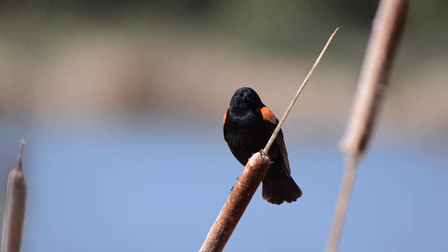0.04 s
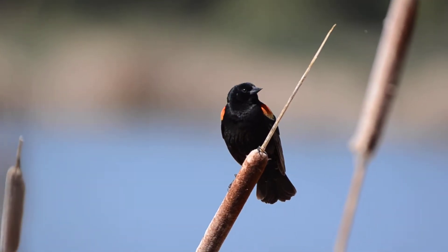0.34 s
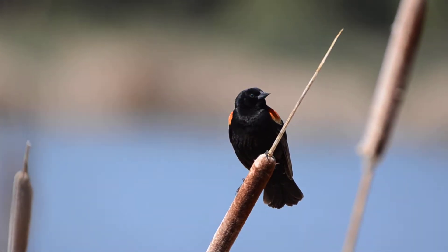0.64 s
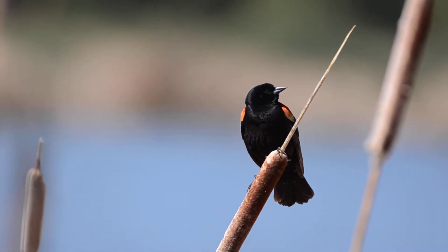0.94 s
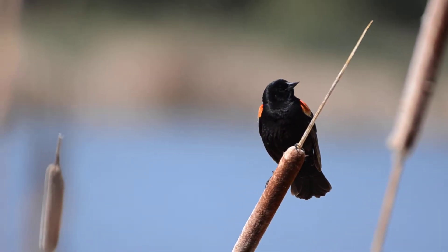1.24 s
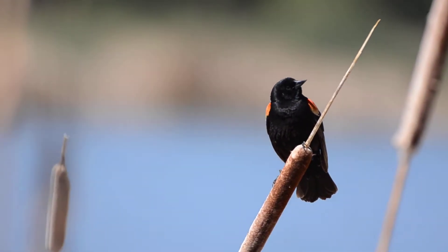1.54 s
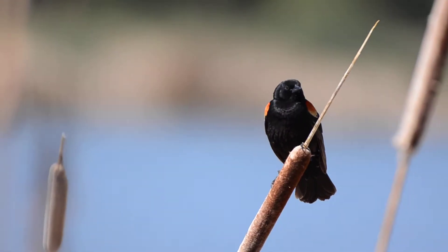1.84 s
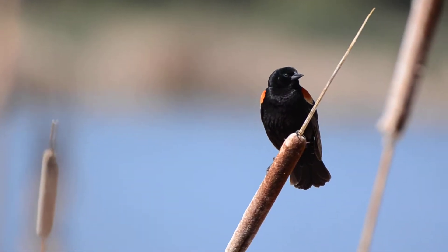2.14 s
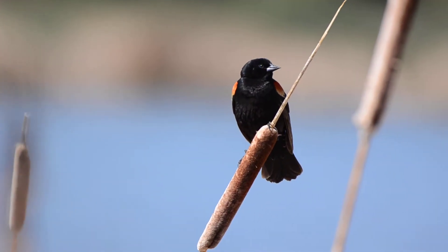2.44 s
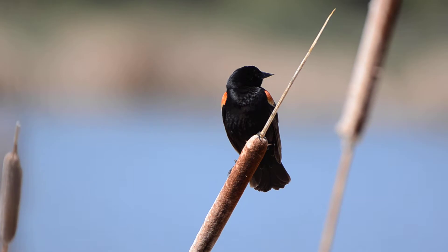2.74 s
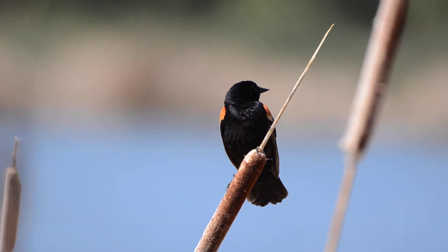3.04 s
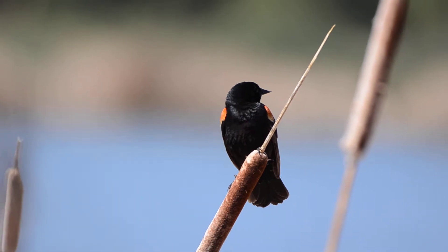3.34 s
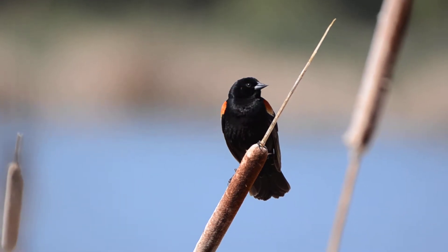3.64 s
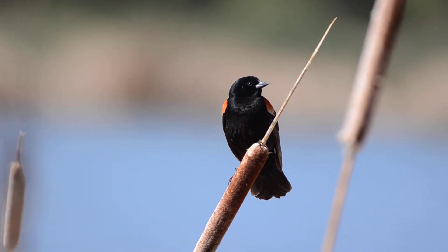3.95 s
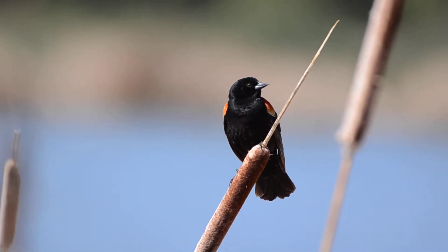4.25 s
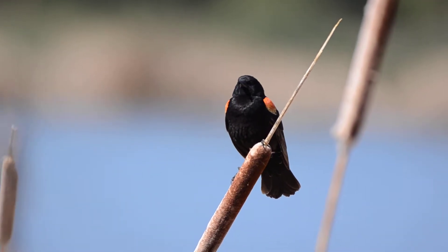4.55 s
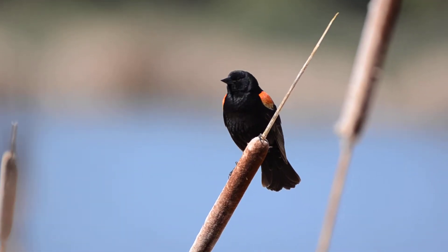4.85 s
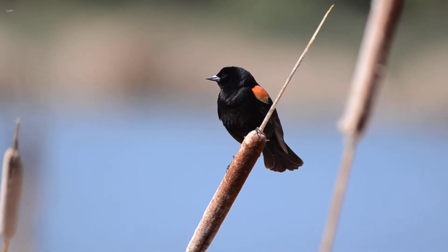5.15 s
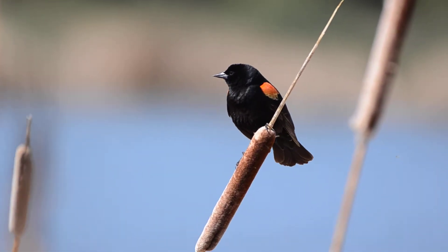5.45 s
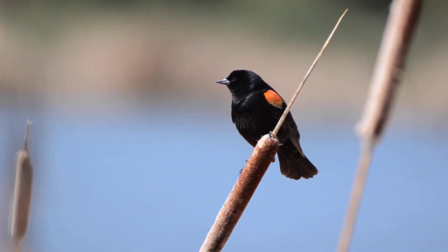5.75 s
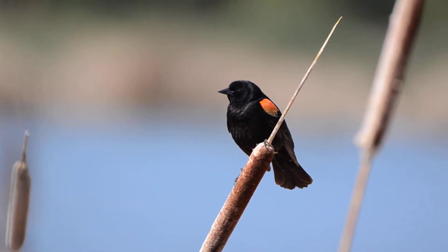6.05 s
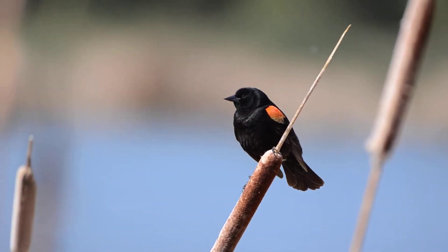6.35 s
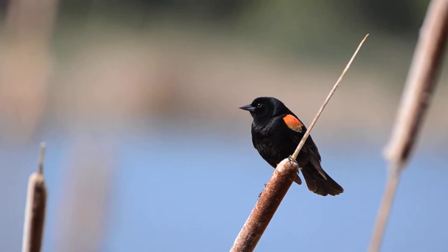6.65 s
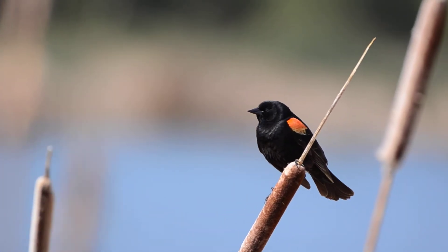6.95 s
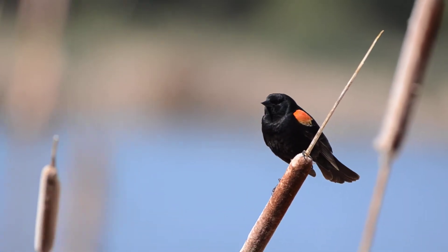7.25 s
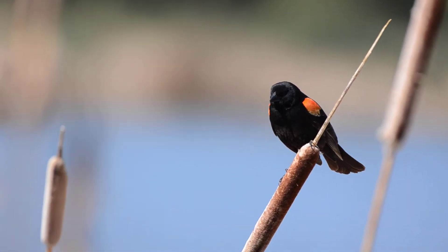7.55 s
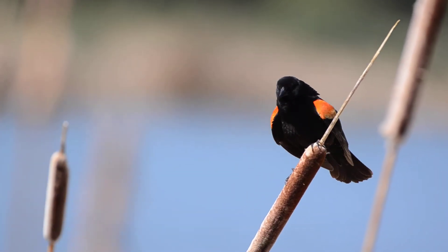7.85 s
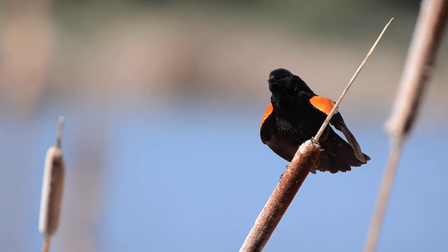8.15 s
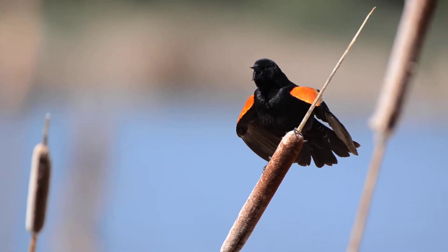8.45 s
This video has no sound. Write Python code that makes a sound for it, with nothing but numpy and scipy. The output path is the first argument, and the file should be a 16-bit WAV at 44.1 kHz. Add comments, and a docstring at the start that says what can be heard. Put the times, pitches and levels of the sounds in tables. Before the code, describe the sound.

Faint blackbird whistles and buzzy trills carry across a marsh over a low murmur of distant traffic. Two spells of gusty wind buffet the microphone, louder than the birds, the second stronger and with a few tiny overload ticks. Between the gusts a close blackbird gives a single dry chip. At the very end it starts singing, with short notes, a quick stutter and a raspy trill.

```python
"""Blackbirds on a windy marsh

Two distant red-winged blackbirds give slurs, whistles and buzzy trills, the two sides of the syrinx
taking turns; a male close to the microphone gives a dry 'check', then starts his own song. Reed beds
scatter every call, and the far shore echoes the second trill. Gusts buffet the microphone, the hardest
eddies overloading it with a tick, while far traffic murmurs behind."""
import sys
import numpy as np
from scipy import signal
from scipy.fft import rfft, irfft, next_fast_len
from scipy.io import wavfile
from scipy.ndimage import map_coordinates

SR = 44100
rng = np.random.default_rng(int(sys.argv[2]) if len(sys.argv) > 2 else 0)


def inscribe(sig):
    """Save sig as 16-bit PCM at rate SR to the path in sys.argv[1].

    A 1-D sig is mono; a 2-D sig holds one channel per row.
    Samples are clipped to [-1, 1] before scaling.
    """
    pcm = np.round(np.clip(np.atleast_2d(sig).T, -1, 1) * 32767)
    wavfile.write(sys.argv[1], SR, pcm.astype(np.int16))


N = 375291

# tones in one trill beat: f/Hz, relative level/dB, place/beat, length/beat, pitch arch/share of f
FIRST_FAR_BEAT = [(2950, 0, 0.5, .6, 0.055), (2570, -5, 0.6, 0.51, 0.023), (3350, -11, 0.2, 0.91, .03)]
SECOND_FAR_BEAT = [(2940, 0, 0.4, .62, 0.062), (2610, -13.5, 0.55, 0.63, .03), (3570, -16, 0.54, .9, .03),
                   (3820, -10.5, .5, 0.69, 0.028), (4120, -13, .9, 0.83, 0.045), (5523, -18, .1, 0.32, .04)]
CLOSE_BEAT = [(2920, 1, 0.34, 0.99, 0.037), (2630, -14, 0.3, .9, .04), (3660, -13, 0.15, 0.53, 0.022),
              (3800, -5, .45, 0.7, 0.065), (4360, -14, .8, 1, .04), (5970, -9, 0.88, 0.35, 0.024),
              (6200, -16.5, 0.35, .8, .04)]
# close male's opening notes and hoarse lead-in: t/s, length/s, start f/Hz, end f/Hz, level/dB
OPENING_NOTES = [(8.045, 0.12, 1463, 1518, -39.5), (8.068, 0.071, 5900, 6090, -73),
                 (8.208, 0.031, 6070, 6320, -65.5), (8.214, 0.034, 2373, 2240, -56),
                 (8.236, 0.057, 6116, 5690, -73), (8.233, 0.0073, 1650, 1947, -39.5),
                 (8.238, 0.022, 1940, 1994, -52)]
LEAD_IN_NOTES = [(8.339, 0.033, 2465, 2717, -36.5), (8.362, 0.026, 4470, 4876, -49.5)]
# his stutter of falling chips: t/s, level/dB
STUTTER_CHIPS = [(8.2825, -42), (8.2922, -35), (8.3015, -36), (8.3105, -36.5), (8.3195, -42), (8.3285, -47)]
# partials of his 'check': f/Hz, relative level/dB
CHECK_PARTIALS = [(1150, -0.5), (1750, -10), (2640, -1.5), (3380, -5.5), (4140, -1.5), (4870, -4),
                  (5600, -12)]
# hiss in a bird's voice: f/Hz, relative density/dB
RASP_SPECTRUM = [(700, -46), (1500, -5), (4800, -8), (6500, -18), (8500, -20), (10500, -28.5),
                 (13000, -24.5), (16000, -44.5)]
# distant down-slurs: t/s, start f/Hz, level/dB
FAR_SLURS = [(.29, 2270, -64), (.35, 3000, -63.5), (.65, 2000, -57), (1.955, 2400, -62.5),
             (2.54, 2234, -48.5), (2.835, 2250, -60), (3.91, 2357, -65), (5.675, 2291, -54.5)]
# distant whistles: t/s, length/s, f/Hz, level/dB
FAR_WHISTLES = [(1.742, 0.029, 1920, -62), (2.672, 0.059, 3867, -60.5), (2.737, .091, 2407, -58.5),
                (5.607, 0.061, 2002, -58.5), (5.685, 0.064, 2074, -53.5), (5.768, .028, 4207, -53),
                (5.888, 0.078, 2255, -59), (5.905, 0.15, 1995, -59), (6.119, .13, 1408, -49),
                (6.245, 0.066, 2306, -61), (6.55, 0.047, 1447, -52), (6.944, 0.051, 2420, -58),
                (7.919, 0.09, 1032, -45)]
# decay of the scatter in the reed beds: f/Hz, t60/s
REED_DECAY = [(1500, .4), (2600, .75), (4000, .6), (6000, .3)]
# gusts over the microphone: crest t/s, level/dB, half-length/s
WIND_GUSTS = [(1.585, -43.5, 0.038), (2.19, -42.5, 0.14), (2.819, -34, .11), (3.08, -24.5, 0.094),
              (3.319, -26.5, 0.031), (3.479, -25.5, 0.043), (3.611, -33, 0.054), (4.038, -39.5, 0.035),
              (6.049, -40, 0.3745), (6.78, -19, .095), (7.113, -24.5, .04), (7.348, -25.5, 0.12),
              (7.628, -22, .095), (7.994, -28, 0.048), (8.33, -35.5, 0.24)]
# single eddies striking the microphone: t/s, level/dB, centre f/Hz
EDDIES = [(0.829, -27, 167), (0.912, -36, 130), (1.9, -34, 107), (2.262, -37, 166), (2.863, -17.5, 177),
          (2.902, -18, 248), (2.922, -14, 281), (3.003, -19, 197), (3.059, -25, 275), (3.105, -16, 278),
          (3.147, -19, 220), (3.35, -17, 233), (3.467, -17.5, 187), (3.493, -14, 311), (3.731, -27.5, 169),
          (4.307, -30, 158), (5.39, -22, 113), (6.07, -31, 111), (6.307, -32.5, 123.8), (6.495, -27.5, 133),
          (6.546, -20.5, 370), (6.609, -22.5, 251.4), (6.678, -15, 213), (6.726, -14, 400),
          (6.754, -8.5, 380), (6.78, -13.5, 350), (6.81, -14, 362), (6.855, -21, 333.5),
          (6.896, -12.5, 413.2), (6.944, -13, 385), (7.125, -15.5, 322.8), (7.236, -20, 324),
          (7.349, -18, 397), (7.553, -15, 392), (7.574, -18, 380.3), (7.638, -7, 359.4),
          (7.665, -11.5, 417.5), (7.727, -17.5, 300), (7.985, -15.5, 320), (8.001, -14, 362),
          (8.031, -12.5, 242), (8.218, -17, 316)]
# overloads under the hardest eddies: t/s, relative peak/dB
OVERLOADS = [(6.7201, -29), (6.7528, -47), (6.762, -27.5), (7.6345, -35.5), (8.0304, -42.5)]
# murmur of far traffic and reeds: f/Hz, relative density/dB
MURMUR_SPECTRUM = [(15, -38.5), (25, -6), (113, -1), (129, -12.5), (164, -12.5), (183, -26.5), (209, -3),
                   (240, -19), (274, -8.5), (349, -13), (648, -6.5), (1530, -22), (1800, -26.5),
                   (4500, -44), (15500, -56.5)]
# one far engine's lines: f/Hz, relative level/dB
ENGINE_LINES = [(70.0, -61), (107.7, -52.5), (215.3, -63.5), (269.2, -66.5)]


def trill(beat, start, end, beat_hz, db, swell_db, rough, fade_s=.0034):
    """The two sides of the syrinx take turns in each beat; every tone arches, never twice alike."""
    out, t = np.zeros(N), clock(end - start)
    gate = np.clip(np.minimum(t, t[-1] - t) / fade_s, 0, 1)
    effort = gate * amp(db + swell_db * (t / t[-1] - 1.5))
    for hz, tone_db, place, share, arch in beat:
        u = 2 * ((beat_hz * t - place + .5) % 1 - .5) / share  # -1 to 1 while the tone sounds
        pitch = hz * (1 + arch * (.3 - np.minimum(u ** 2, 1.5)) + .011 * wobble(220, t))
        level = amp(tone_db + 2 * wobble(200, t)) / (1 + u ** 6)
        add(out, start, effort * level * tone(pitch, t, rough, rough_rate=1100))
    return out


def notes(table, rough, rough_rate, taper=.72):
    """Each whistled note swells and fades while it slides in pitch."""
    out = np.zeros(N)
    for s, length, start_hz, end_hz, db in table:
        t = clock(length)
        swell = np.sin(np.pi * t / length) ** taper
        pitch = start_hz + (end_hz - start_hz) * t / length
        add(out, s, amp(db) * swell * tone(pitch, t, rough, rough_rate))
    return out


def stutter(top_hz=5200, rest_hz=3480, drop_s=.0012, chip_s=.0066):
    """Each chip plunges onto the same pitch."""
    out, t = np.zeros(N), clock(chip_s)
    pitch = rest_hz + (top_hz - rest_hz) * np.exp(-t / drop_s)
    swell = np.sin(np.pi * (t / chip_s) ** .7) ** 1.3
    for s, db in STUTTER_CHIPS:
        add(out, s, amp(db) * swell * tone(pitch, t, rough=.25, rough_rate=2000))
    return out


def check(s=5.013, db=-49, hiss_db=-48, width_s=.0065):
    """A dry call: a brief, rough stack of partials with a hiss."""
    out, t = np.zeros(N), clock(.06)
    from_crest = t - t.mean()
    swell = np.exp(-.5 * (from_crest / width_s) ** 2)
    bend = 1 - .0548 * np.tanh(from_crest / .01275) ** 2
    stack = sum(amp(level) * tone(hz * bend, t, rough=.7, rough_rate=700)
                for hz, level in CHECK_PARTIALS)
    hiss = noise(lambda hz: amp(along(RASP_SPECTRUM, hz)), len(t))
    add(out, s - t.mean(), amp(db) * swell * stack + amp(hiss_db) * swell ** 2 * hiss)
    return out


def rasp(song, hiss_db, octave_db, dull_hz):
    """Pushed hard, a voice adds its octave and a hiss."""
    analytic = signal.hilbert(song, next_fast_len(N))[:N]
    octave = np.cos(2 * np.angle(analytic))
    hiss = noise(lambda hz: amp(along(RASP_SPECTRUM, hz)) / np.hypot(1, (hz / dull_hz) ** 4), N)
    return np.abs(analytic) * (amp(hiss_db) * hiss + amp(octave_db) * octave)


def close_male():
    """Near the microphone: a 'check', later clear notes that break into a hoarse buzz."""
    opening = notes(OPENING_NOTES, rough=.037, rough_rate=750)
    buzz = stutter() + notes(LEAD_IN_NOTES, rough=.6, rough_rate=1500, taper=2)
    buzz += trill(CLOSE_BEAT, start=8.383, end=8.54, beat_hz=38.9, db=-43.3, swell_db=2, rough=.62)
    return opening + buzz + rasp(buzz, hiss_db=-19, octave_db=-37, dull_hz=7730) + check()


def far_calls(slur_s=.034, fall=.8, lift=.01):
    """From across the marsh come quick, rough falling slurs and purer, barely rising whistles."""
    slurs = [(s, slur_s, hz, hz * fall, db) for s, hz, db in FAR_SLURS]
    whistles = [(s, length, hz * (1 - lift), hz * (1 + lift), db) for s, length, hz, db in FAR_WHISTLES]
    return notes(slurs, rough=.46, rough_rate=330) + notes(whistles, rough=.28, rough_rate=200)


def reeds(x, early_db=3, early_t60=.044):
    """Close stems answer at once, then the whole marsh fades away."""
    hz, t, spectrum = signal.stft(rng.standard_normal(SR), SR, nperseg=256)
    marsh = amp(-60 * t / along(REED_DECAY, hz)[:, None])
    stems = amp(early_db - 60 * t / early_t60)
    tail = signal.istft(spectrum * (marsh + stems), SR, nperseg=256)[1]
    return signal.fftconvolve(x, np.pad(tail / np.linalg.norm(tail), (200, 0)))[:N]


def shore(x, delay_s=.42, db=-11.5, dull_hz=3900):
    """The wooded far shore sends back a late, dull, smeared echo."""
    late = np.pad(reeds(x), (int(delay_s * SR), 0))[:N]
    return amp(db) * filtered(late, lambda hz: 1 / np.hypot(1, (hz / dull_hz) ** 6))


def turbulence(centre_hz, speed, low_hz, reach, steep):
    """Eddy pressure swept past: small eddies die out steeply, and the microphone sheds the deep bass."""
    def spectrum(hz):
        bass_cut = (hz / np.hypot(hz, low_hz)) ** 2.3
        return bass_cut * np.exp(-(hz / (reach * centre_hz)) ** steep)
    return map_coordinates(noise(spectrum, len(speed)), [np.cumsum(speed)], mode="mirror")


def breeze(lull_db=-56.5, calm_db=-33, lumps_db=3.5, flank=3.3, quicken=.58):
    """Gusts rise out of light air; faster air is louder and sweeps eddies past sooner, so brighter."""
    t = np.arange(N) / SR
    gusts = (amp(db) / (1 + np.abs((t - s) / half_s) ** flank) for s, db, half_s in WIND_GUSTS)
    power = amp(lull_db) ** 2 + sum(gust ** 2 for gust in gusts)
    level_db = 10 * np.log10(power) + lumps_db * wobble(35, t)
    speed = np.clip(amp(quicken * (level_db - calm_db)), 1, 2.5)
    return amp(level_db) * turbulence(128, speed, low_hz=60, reach=.59, steep=.83)


def buffets(cycles=2.913, typical_db=-20.5, growth=.2, soft_hz=250):
    """Each large eddy is a lumpy swell on the microphone, brightest at its crests; slow ones thud."""
    out, t = np.zeros(N), np.arange(8192) / SR
    middle = t.mean()
    for s, db, centre_hz in EDDIES:
        length = cycles * amp(growth * (db - typical_db)) / centre_hz  # stronger eddies last longer
        swell = np.exp(-.5 * np.abs((t - middle) / (.4915 * length)) ** 1.305)
        flow = swell * amp(3.2 * np.tanh(wobble(170, t)))
        speed = np.sqrt(np.clip(flow, .2, 1.2))
        reach = 1.655 * (centre_hz / soft_hz) ** .26
        puff = flow * turbulence(centre_hz, speed, low_hz=82, reach=reach, steep=1.392)
        add(out, s - middle, amp(db) * puff * np.linalg.norm(swell) / np.linalg.norm(puff))
    return out


def overload_ticks(gain_db=5, decay_s=.00006):
    """Each overload of the microphone is a single sharp tick."""
    out, t = np.zeros(N), clock(.002)
    for s, db in OVERLOADS:
        add(out, s, amp(db + gain_db) * t / decay_s * np.exp(1 - t / decay_s))
    return out


def far_traffic(murmur_db=-49, engine_db=-1):
    """Beyond the marsh: a gently swelling murmur and one engine's wavering drone."""
    t = np.arange(N) / SR
    swell = amp(murmur_db + .4 * wobble(2, t))
    murmur = swell * noise(lambda hz: amp(along(MURMUR_SPECTRUM, hz)), N)
    drone = sum(amp(db + engine_db) * tone(np.full(N, hz), t, rough=1.1, rough_rate=9.9)
                for hz, db in ENGINE_LINES)
    return murmur + drone


def amp(db):
    """Decibels to gain."""
    return 10 ** (np.asarray(db) / 20)


def along(points, hz):
    """Interpolate (f/Hz, value) points on a log frequency axis."""
    freqs, values = np.transpose(points)
    return np.interp(np.log(hz + 1), np.log(freqs + 1), values)


def clock(length):
    """Sample times over length seconds."""
    return np.arange(int(length * SR)) / SR


def wobble(rate, t):
    """A smooth random curve over the times t, rate knots a second."""
    return map_coordinates(rng.standard_normal(8192), [t * rate], mode="wrap")


def filtered(x, response):
    """x shaped by a frequency response."""
    size = next_fast_len(len(x) + 4096)
    return irfft(rfft(x, size) * response(np.fft.rfftfreq(size, 1 / SR)), size)[:len(x)]


def noise(response, size):
    """Coloured noise of rms 1."""
    x = filtered(rng.standard_normal(size), response)
    return x / np.sqrt(np.mean(x ** 2) + 1e-20)


def tone(hz, t, rough, rough_rate):
    """A tone of rms 1 on a pitch curve; rough is its phase jitter in radians."""
    return np.sqrt(2) * np.sin(2 * np.pi * np.cumsum(hz) / SR + rough * wobble(rough_rate, t))


def add(track, s, sound):
    """Mix a sound into the track at s seconds."""
    part = track[max(int(s * SR), 0):][:len(sound)]
    part += sound[:len(part)]


def scene():
    """One microphone in the reeds: birds at two distances, over wind and traffic."""
    first = trill(FIRST_FAR_BEAT, start=2.85, end=3.485, beat_hz=45.5, db=-60, swell_db=4.5, rough=.36)
    second = trill(SECOND_FAR_BEAT, start=5.803, end=6.505, beat_hz=44.4, db=-54.5, swell_db=2, rough=.36)
    second += rasp(second, hiss_db=-22.5, octave_db=-38, dull_hz=6000)
    far = first + second + far_calls()
    close = close_male()
    scatter = amp(-6.5) * reeds(far) + amp(-10) * reeds(close, early_db=14, early_t60=.12)
    echo = shore(second)
    wind = breeze() + buffets() + overload_ticks()
    return (far + close + scatter + echo + wind + far_traffic())[None]


def record(dry, ceiling=.68, top_hz=15750):
    """The recorder rounds off the strongest eddies and keeps nothing above its band limit."""
    rounded = dry[0] / (1 + (dry[0] / ceiling) ** 6) ** (1 / 6)
    return filtered(np.pad(rounded, SR, "reflect"), lambda hz: hz < top_hz)[None, SR:-SR]


dry = scene()
out = record(dry)
inscribe(out)
```